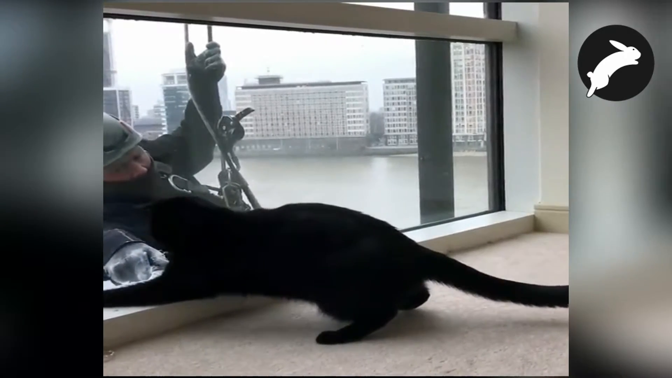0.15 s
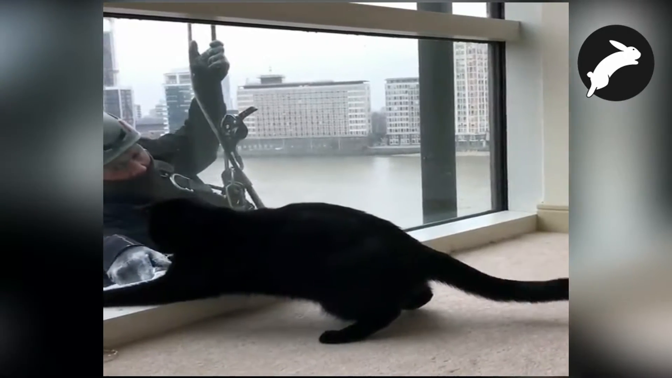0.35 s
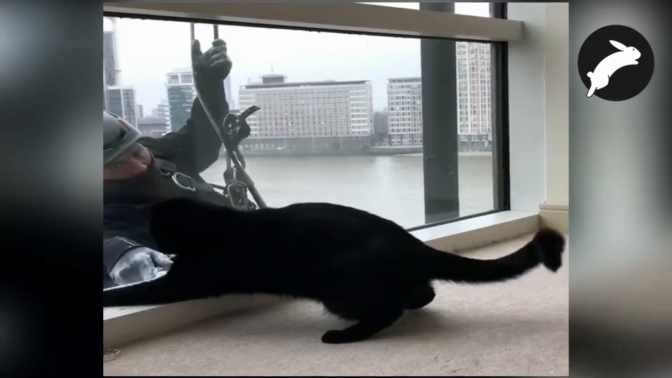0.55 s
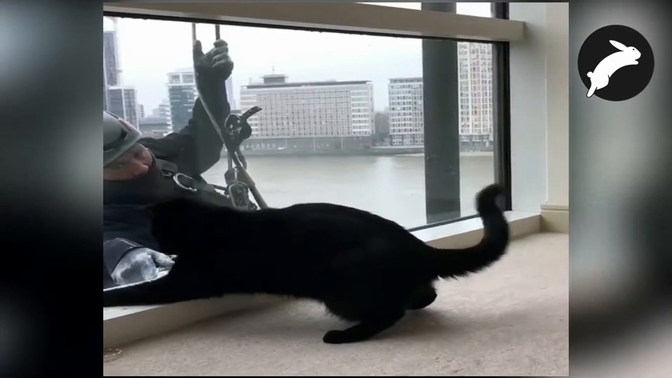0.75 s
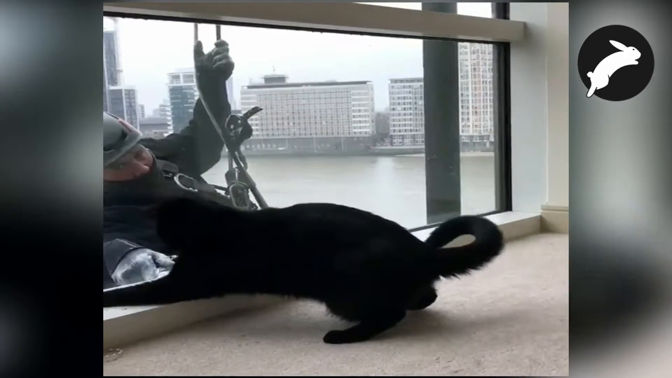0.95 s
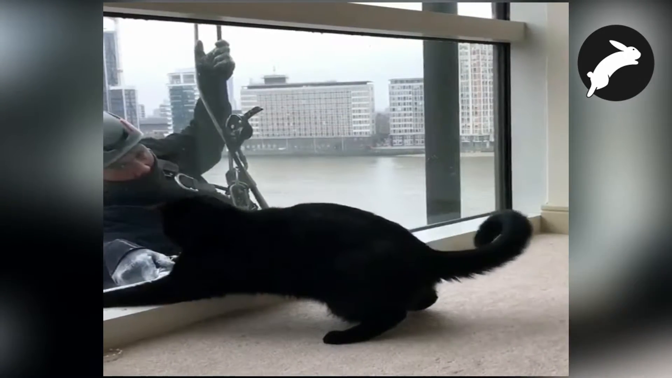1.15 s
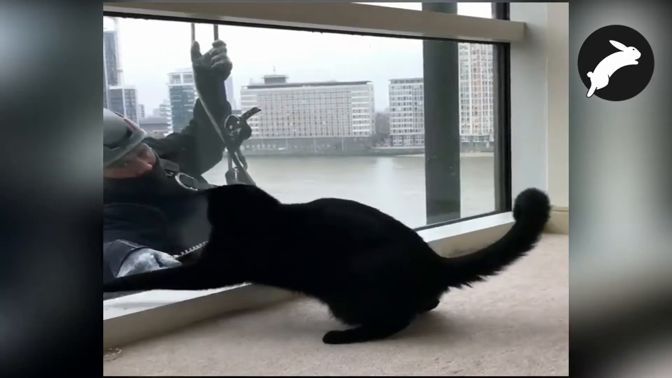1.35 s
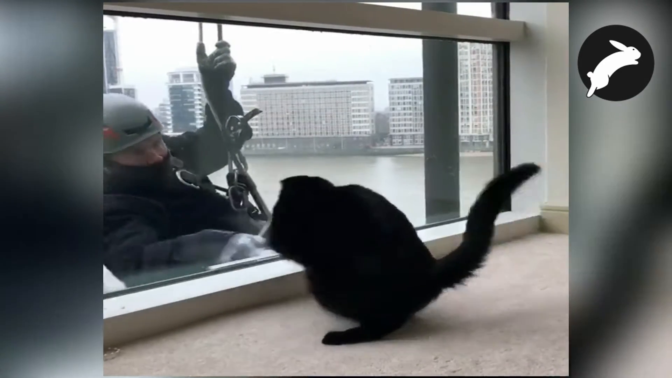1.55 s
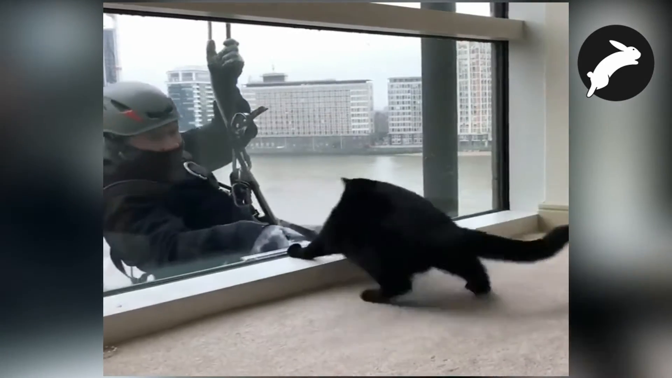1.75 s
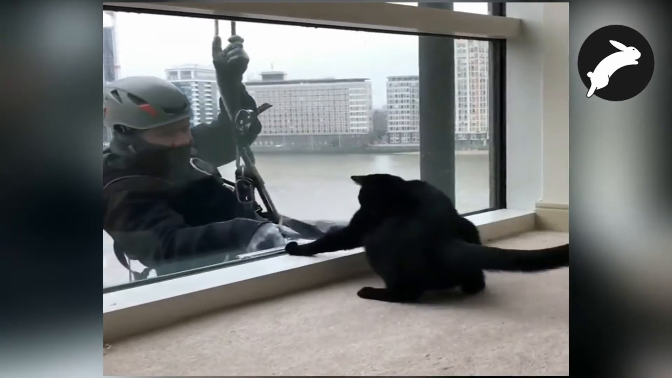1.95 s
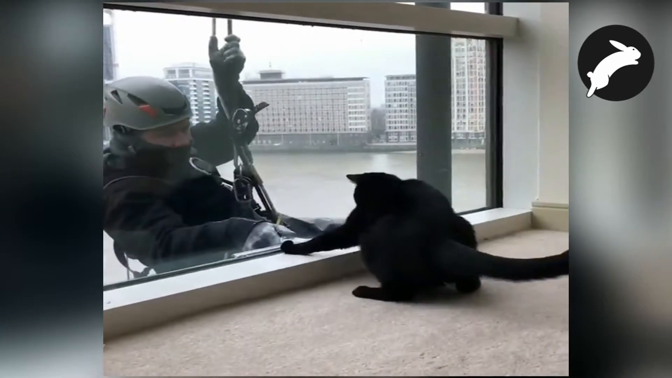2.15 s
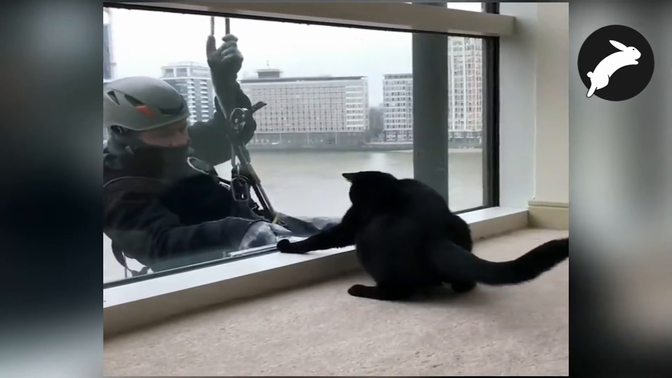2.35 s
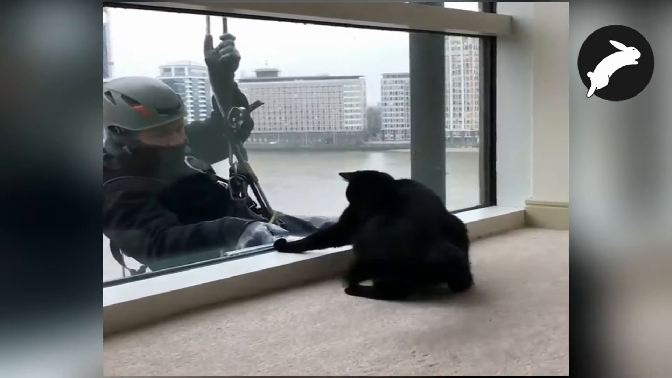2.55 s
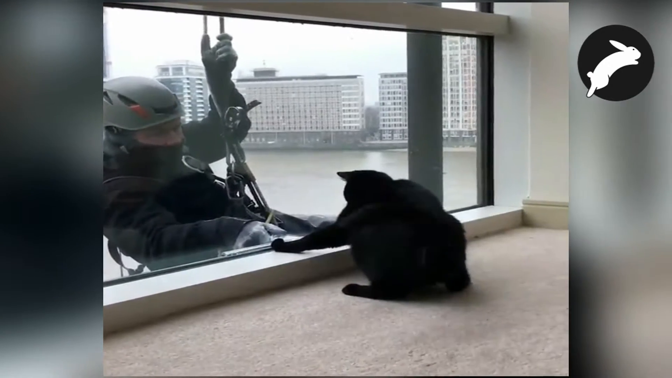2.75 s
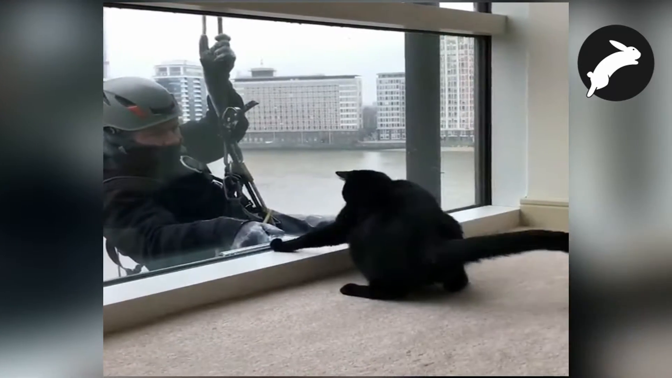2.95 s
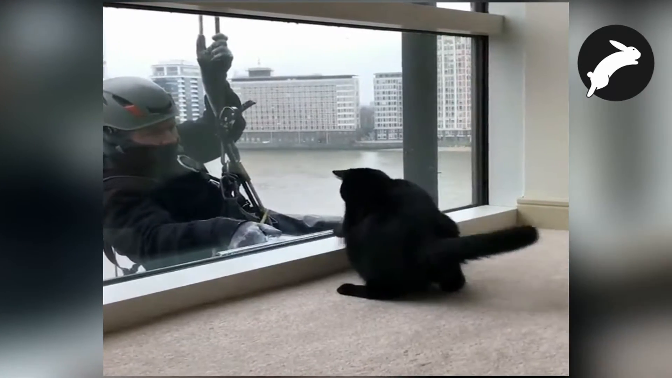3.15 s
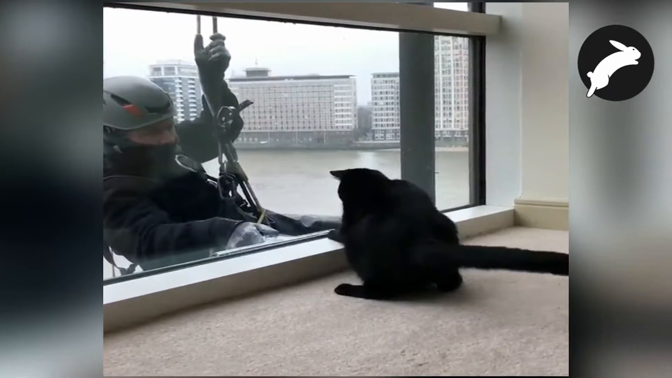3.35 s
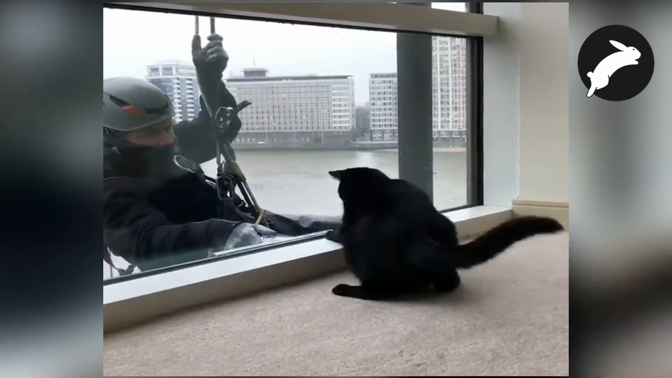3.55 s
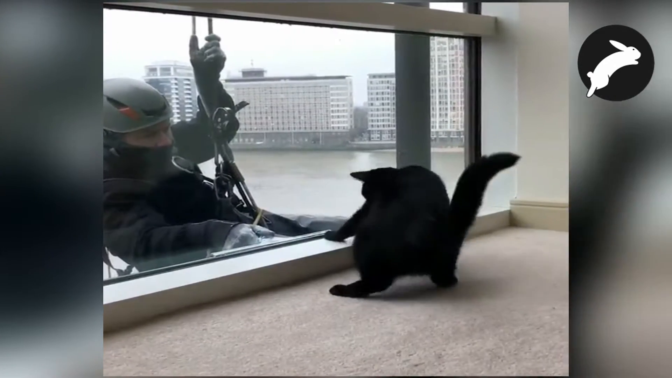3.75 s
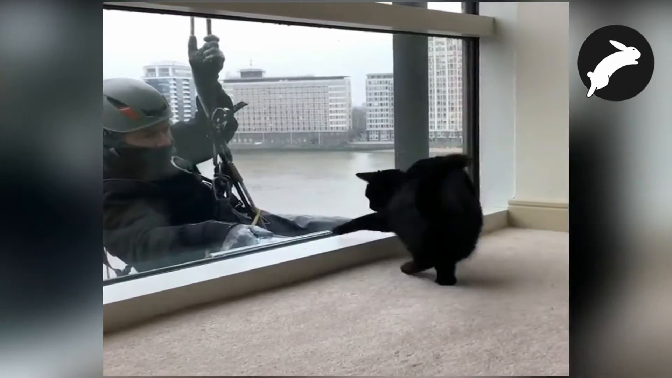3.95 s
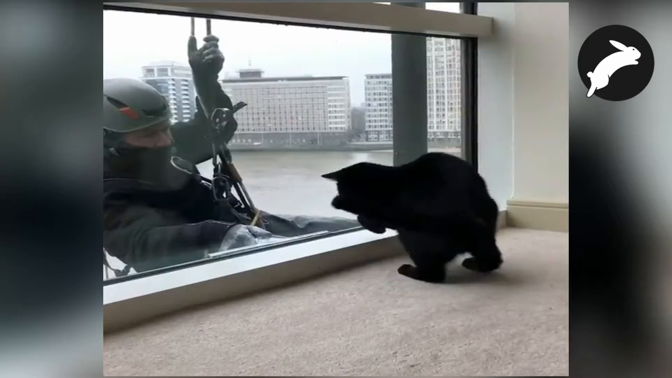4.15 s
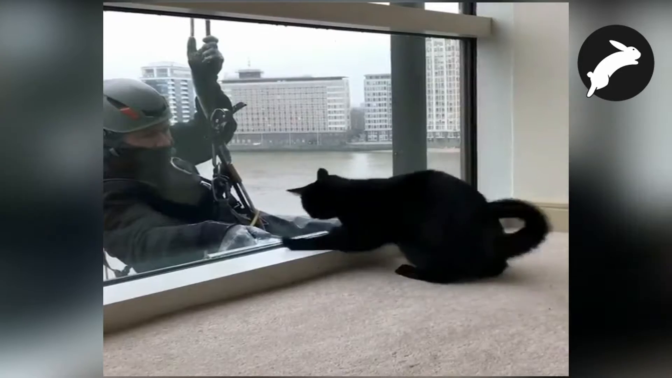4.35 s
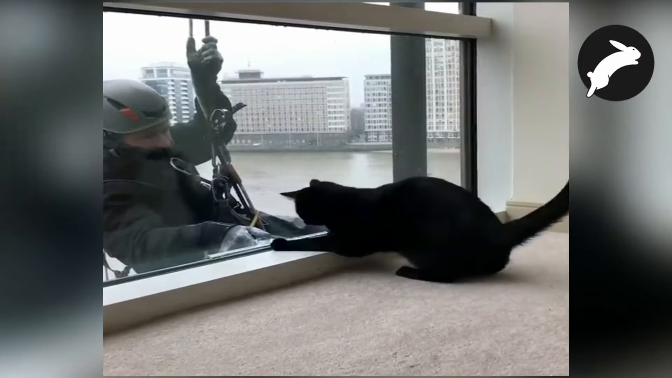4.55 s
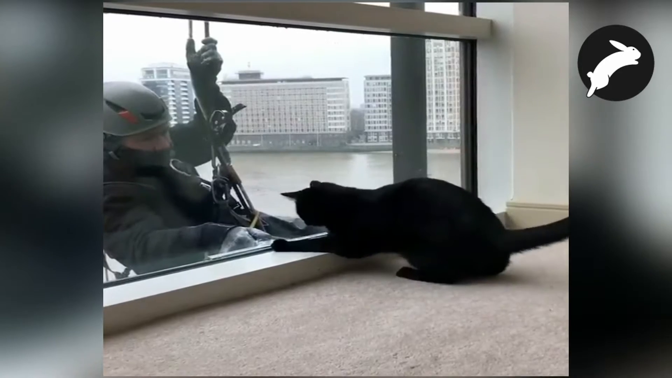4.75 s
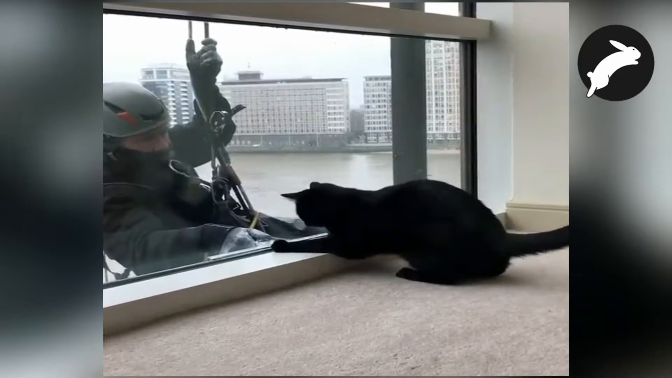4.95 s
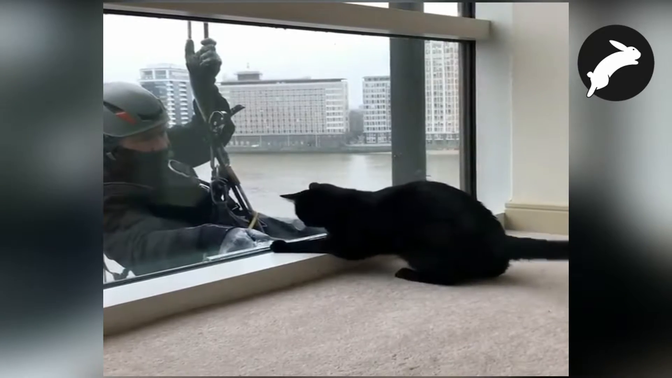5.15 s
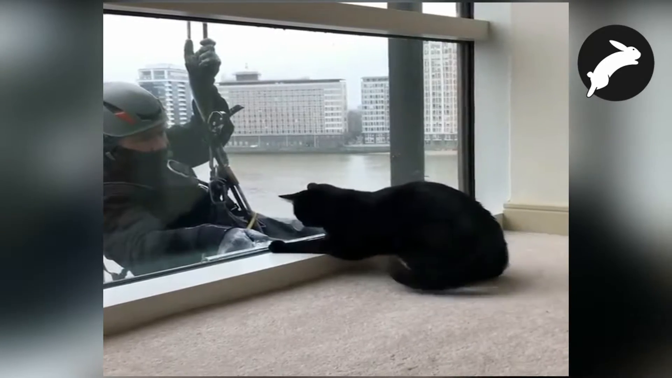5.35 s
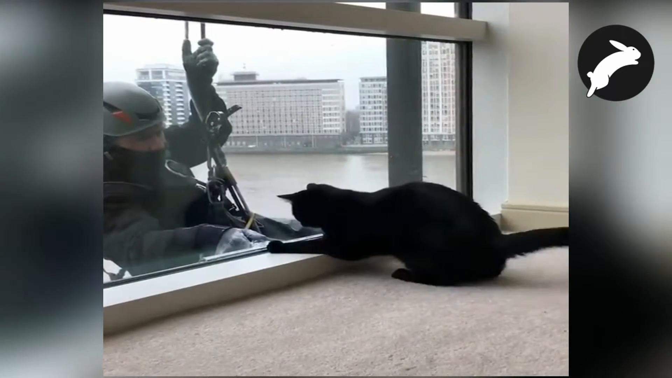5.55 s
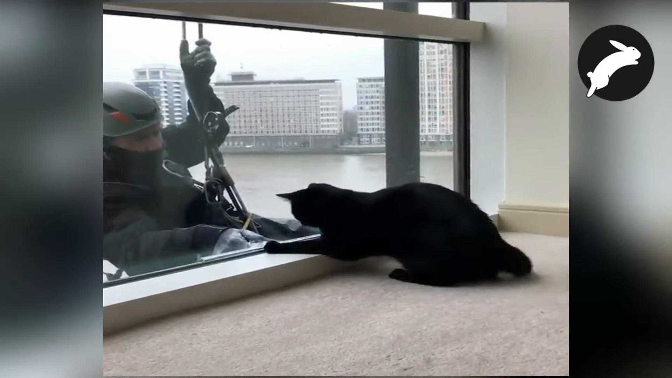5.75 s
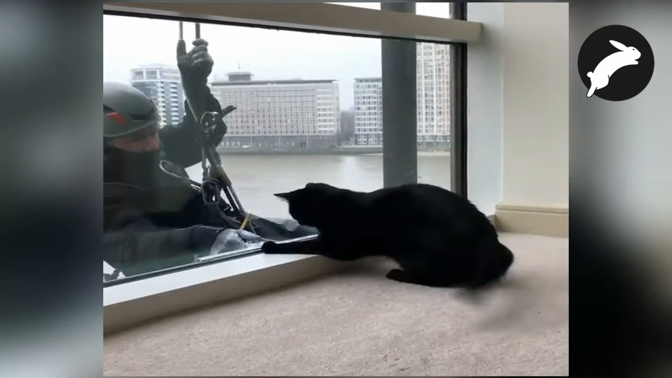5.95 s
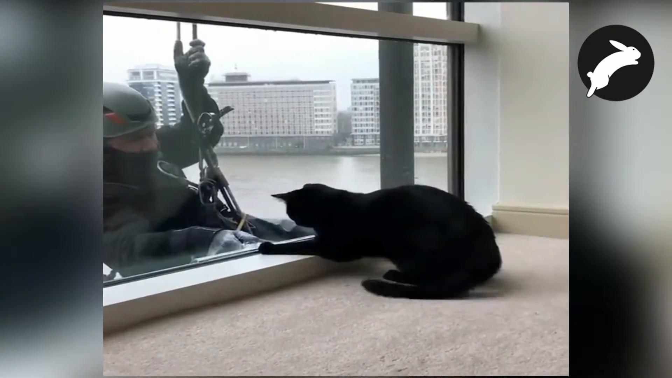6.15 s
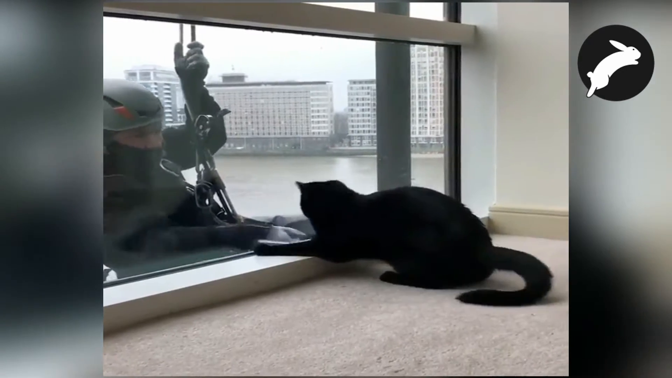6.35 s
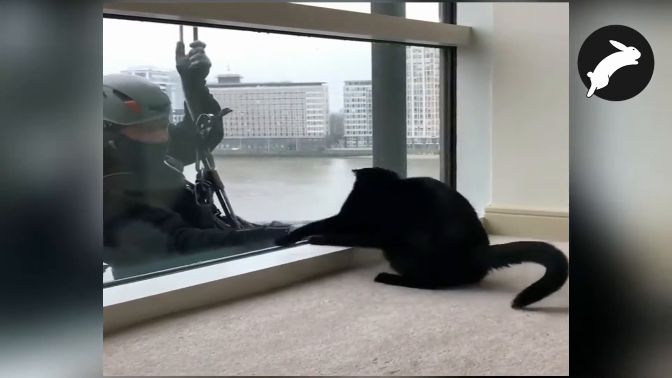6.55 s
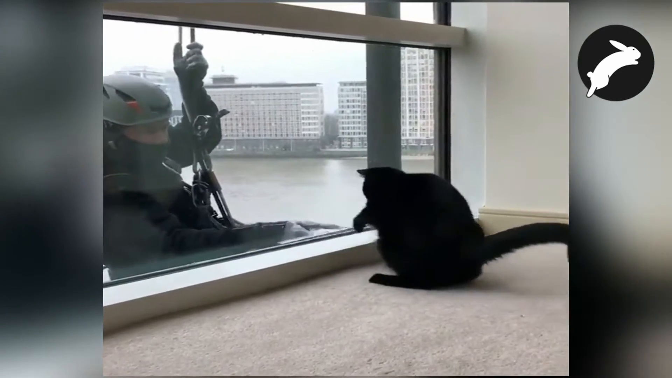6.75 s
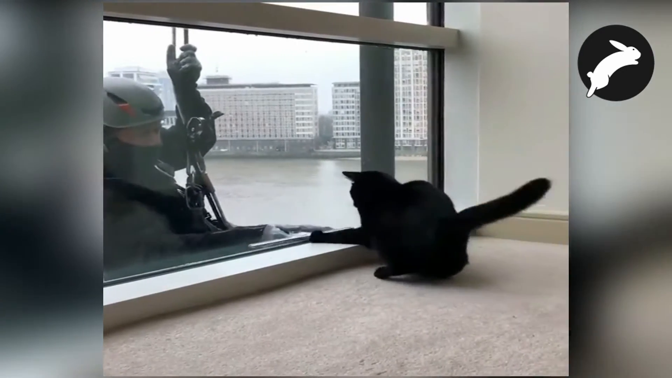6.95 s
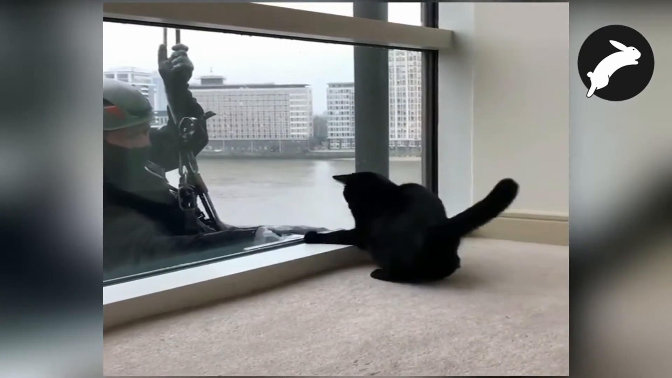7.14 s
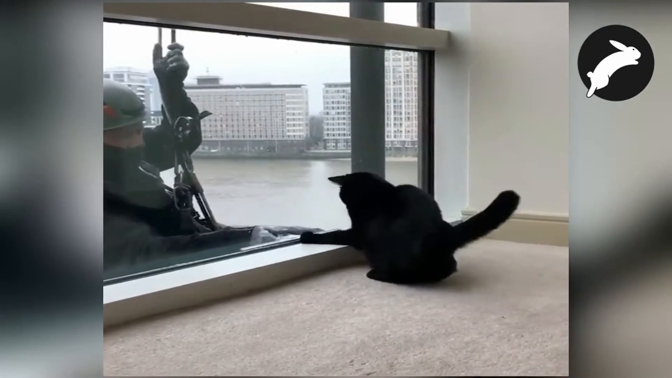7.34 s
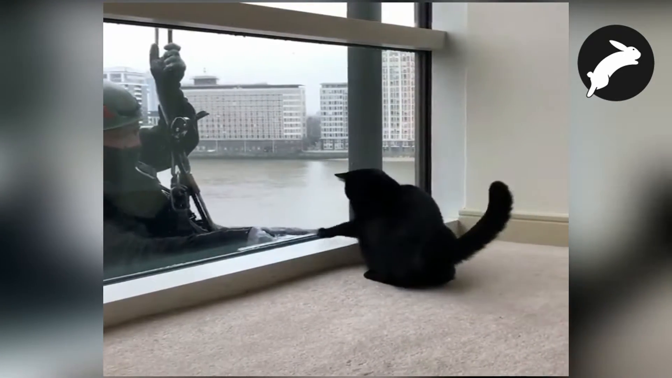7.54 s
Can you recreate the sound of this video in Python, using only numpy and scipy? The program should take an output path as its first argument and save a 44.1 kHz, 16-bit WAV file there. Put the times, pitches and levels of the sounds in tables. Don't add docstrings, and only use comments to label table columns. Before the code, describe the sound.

Inside a quiet carpeted flat, soft pads knock and brush on window glass in separate flurries while muffled traffic and a wavering engine hum outside.

```python
import sys
import numpy as np
from scipy import signal
from scipy.fft import rfft, irfft, next_fast_len
from scipy.io import wavfile
from scipy.ndimage import uniform_filter1d, map_coordinates

SR = 44100
rng = np.random.default_rng(int(sys.argv[2]) if len(sys.argv) > 2 else 0)


def amplitude_ratio(level_db):
    exponent = np.asarray(level_db, float) / 20
    return 10 ** exponent


def unload_wav(signal):
    wavfile.write(
        sys.argv[1],
        SR,
        np.round(np.clip(np.atleast_2d(signal).T, -1, 1) * 32767).astype(np.int16),
    )


N = 334968
T = np.arange(N) / SR

# [t/s, strength/dB]
CITY_STRENGTH = [(0.0, 1), (0.7, 0.5), (1.3, 1.5), (1.9, 0.5), (2.8, 0), (3.6, 0.5), (4.2, 0.5), (5.0, 0),
                 (5.9, -1), (6.6, 1.5), (7.2, 3), (7.6, 0)]
# [f/Hz, level/dB per Hz]
RUMBLE_COLOUR = [(16, -40), (28, -0.5), (75, 4), (99, -1), (140, -7), (180, -37), (310, -120)]
HUM_COLOUR = [(74, -48), (125, -10), (171, -0.5), (252, -7), (286, -7), (421, -12.5), (600, -20),
              (780, -77), (1320, -120)]
TYRE_COLOUR = [(290, -38), (500, -2.5), (531, -10), (612, -2.5), (790, -4.5), (1020, 0.5), (1900, -9.5),
               (2500, -13.5), (3250, -21.5), (5500, -120)]
# [f/Hz, width/Hz, level/dB]
ROOM_MODES = [(54.1, 4.2, 4.5), (95, 10, -2), (171.2, 6.3, 4.5), (232, 14.4, 2.5), (287, 8.3, 4)]
# [t/s, firing f/Hz, level/dB]
FIRST_PULL = [
    (0.0, 100.7, -53),
    (0.42, 98.54, -56),
    (0.6, 104.5, -49),
    (0.93, 97.4, -43),
    (1.12, 89.5, -45),
    (1.5, 86.6, -61),
]
SECOND_PULL = [
    (1.9, 63, -67),
    (2.2, 74, -45),
    (2.4, 78.9, -43.5),
    (2.92, 90.2, -43.5),
    (3.2, 87.6, -48.5),
    (3.87, 88.14, -44),
    (4.03, 86.8, -38.5),
    (4.33, 81, -57.5),
]
THIRD_PULL = [
    (4.55, 62.1, -50),
    (5.02, 59.6, -40.5),
    (5.35, 58.7, -41),
    (5.5, 53.5, -39.5),
    (5.81, 52, -41),
    (6.0, 53, -45.5),
    (6.45, 55.9, -45.5),
    (7.0, 63.9, -40),
    (7.6, 59.35, -46.5),
]
# [t/s, depth/dB, half length/s]
AIR_LULLS = [(.416, 11, 0.087), (0.988, 19, 0.057), (1.217, 10, .08), (2.11, 10, .06), (2.315, 17, .06),
             (2.563, 5, 0.057), (3.11, 10, 0.077), (3.956, 21, 0.064), (5.21, 10, 0.14), (5.445, 16, 0.073),
             (5.662, 25, .14), (5.89, 10, .06), (6.82, 10, 0.21)]
# [f/Hz, level/dB per Hz]
HISS_COLOUR = [(1060, -34), (1800, -13.5), (3070, -3), (3470, -4), (4100, -3), (4760, -6), (6180, -5.5),
               (10500, -9), (13400, -6.5), (14200, -14), (14600, -48)]
# [f/Hz, level/dB]
FOLDED_OVERTONES = [(11849, -95), (12845, -98), (13840, -82)]
# [t/s, peak level/dB, centre f/Hz]
FRAME_THUDS = [(.577, -47, 560), (1.437, -32.5, 324), (1.449, -33.5, 400), (1.658, -42, 322),
               (1.667, -31, 400), (1.6876, -30.5, 300), (1.706, -35, 188), (4.365, -35, 213),
               (4.401, -30.5, 196), (4.412, -30.5, 325), (4.427, -30.5, 199), (4.444, -40, 213),
               (4.625, -41, 400), (4.644, -46.5, 386), (6.4267, -37.5, 385), (6.439, -35, 400),
               (6.460, -49, 398), (6.495, -42, 400), (6.925, -38.5, 320), (6.936, -34, 203),
               (6.939, -34.5, 350), (7.048, -35.5, 320), (7.058, -36, 250)]
# [f/Hz, width/Hz, level/dB]
FRAME_MODES = [(195.6, 40, 2.5), (250, 66, -3), (325, 28, -2), (400, 62, -7), (555, 72, -8)]
# [f/Hz, time to fall 60 dB/s]
ROOM_DECAY = [(100, 0.48), (500, 0.27), (1500, 0.48), (5000, 0.38), (12000, 0.12)]
# [t/s, peak level/dB, centre f/Hz]
PAD_KNOCKS = [(1.384, -45, 1045), (1.4367, -29.5, 910), (1.45, -30.5, 1000), (1.646, -27, 675),
              (1.659, -25.5, 1750), (1.666, -25.5, 1150), (1.678, -31, 1240), (1.6875, -21.5, 1000),
              (1.693, -27.5, 1820), (1.698, -24.5, 1080), (1.707, -28, 1060), (4.364, -43.5, 883),
              (4.396, -29, 1080), (4.401, -21, 1010), (4.411, -20, 1270), (4.427, -26, 920),
              (4.444, -33, 1300), (4.635, -48, 1390), (6.240, -46, 1020), (6.4257, -24.5, 854),
              (6.4271, -44, 1800), (6.439, -33.5, 1110), (6.460, -45, 850), (6.883, -41, 1510),
              (6.926, -35, 1150), (6.936, -27.5, 704), (6.939, -27, 1370), (6.950, -34, 1650),
              (7.048, -38, 1050), (7.055, -32, 940)]
# [f/Hz, width/Hz, level/dB]
GLASS_MODES = [(627, 74, -3), (845, 84, -1), (1050, 95, 0), (1192, 60, 2), (1314, 57, 0.5),
               (1422, 63, -0.5), (1595, 65, -3), (1800, 77, -4.5), (2000, 220, -10), (2490, 54, -4.5)]
# [t/s, peak level/dB, centre f/Hz, width/Hz, time to fall 60 dB/s]
CLAW_TICKS = [(1.437, -47.5, 3500, 4000, .06), (1.6461, -20.5, 4050, 2430, 0.018),
              (1.6486, -23, 2880, 1500, 0.018), (1.653, -23, 2160, 1490, 0.02),
              (2.914, -50, 5400, 700, .03), (3.25, -49, 5200, 2500, 0.018),
              (4.3413, -27, 3800, 3000, 0.0053), (4.345, -35.5, 2000, 2000, .031),
              (4.4302, -24.5, 5000, 12000, .0034), (6.4262, -40, 2410, 800, 0.018),
              (6.881, -37.5, 3970, 4000, 0.027), (6.8846, -37, 2190, 3000, .04),
              (7.05, -45, 3480, 4000, .02), (7.539, -44.5, 5450, 600, .022), (7.540, -49, 2840, 900, .022),
              (7.550, -50.5, 5630, 500, .06)]
# [peak t/s, level/dB, rise/dB per s, fall/dB per s]
FUR_STROKES = [
    (1.445, -56, 600, 120),
    (1.538, -61, 300, 900),
    (1.655, -42.5, 3002, 146),
    (4.411, -57, 900, 70),
    (4.465, -38, 210, 323),
    (4.644, -61, 300, 397),
    (6.943, -45, 900, 305),
]
# [f/Hz, level/dB per Hz]
FUR_COLOUR = [(1290, -15), (2200, -4), (4020, -1), (4960, -4.5), (5700, -5.5), (7960, -6.5), (8660, -6),
              (14000, -8.5)]
# [t/s, peak level/dB, f/Hz, time to fall 60 dB/s]
PANE_BOOMS = [
    (1.686, -25.5, 91, 0.14),
    (4.385, -28, 95, 0.089),
    (4.477, -24.5, 82.7, 0.21),
    (6.434, -34, 95, 0.21),
    (6.434, -35, 131, 0.15),
    (6.897, -37, 70.4, 0.11),
]

CONTACT_S = 0.0042


def unit(x):
    return x / np.sqrt(np.mean(x ** 2) + 1e-20)


def along(points, hz):
    f, value = np.transpose(points)
    return np.interp(np.log(hz + 1), np.log(f + 1), value)


def wobble(rate):
    knots = rng.standard_normal(int(N * rate / SR) + 4)
    return map_coordinates(knots, [T * rate])


def filtered(x, response):
    size = next_fast_len(x.shape[-1] + 8192)
    spectrum = rfft(x, size) * response(np.fft.rfftfreq(size, 1 / SR))
    return irfft(spectrum, size)[..., :x.shape[-1]]


def rush(colour, patchy_db):
    z = signal.stft(rng.standard_normal(N + 512), nperseg=512)[2]
    patches = uniform_filter1d(rng.standard_normal(z.shape), size=5, axis=0)
    patches = uniform_filter1d(patches, size=12, axis=1)
    noise = signal.istft(z * amplitude_ratio(patchy_db * unit(patches)), nperseg=512)[1][:N]
    return unit(filtered(noise, lambda f: amplitude_ratio(along(colour, f))))


def resonance(f, hz, width):
    return 1j * f * width / (hz * hz - f * f + 1j * f * width)


def body(modes, spread_db):
    gains = amplitude_ratio(spread_db * rng.standard_normal(len(modes)))
    gains = gains * (-1) ** np.arange(len(modes))

    def response(f):
        return sum(g * amplitude_ratio(db) * resonance(f, hz, width) for g, (hz, width, db) in zip(gains, modes))
    return response


def blow(length):
    t = T[:SR // 5]
    push = 0.079 * rng.standard_normal(len(t)) * np.exp(-t / max(length, 0.0005))
    push[0] = min(1, CONTACT_S / length)
    return push


def add(track, s, sound, peak_db):
    at = round(s * SR)
    scaled = amplitude_ratio(peak_db) * sound / np.abs(sound).max()
    track[at:at + len(sound)] += scaled[:len(track) - at]


def city():
    strength_db = np.interp(T, *np.transpose(CITY_STRENGTH))
    swell = wobble(4.036)
    rumble_db = -48.5 + strength_db + swell + 0.95 * wobble(4.55)
    hum_db = -56.5 + 0.076 * strength_db + 0.81 * swell
    tyre_db = -60 + 0.098 * strength_db + 0.36 * swell
    rumble = amplitude_ratio(rumble_db) * rush(RUMBLE_COLOUR, patchy_db=1)
    hum = amplitude_ratio(hum_db) * rush(HUM_COLOUR, patchy_db=2.0)
    tyres = amplitude_ratio(tyre_db) * rush(TYRE_COLOUR, patchy_db=1.5)

    def room_lift(f):
        return 1 + sum(amplitude_ratio(db - 4.5) * resonance(f, hz, width) for hz, width, db in ROOM_MODES)
    return filtered(rumble + hum, room_lift) + tyres


def engine():
    out = np.zeros(N)
    lull_db = sum(depth * np.clip(1 - np.abs(T - s) / half, 0, 1) for s, depth, half in AIR_LULLS)
    pulls = [(FIRST_PULL, -9, -28, -26), (SECOND_PULL, -7, -26, -26), (THIRD_PULL, -30, -8, -24)]
    for pull, half_db, three_halves_db, twice_db in pulls:
        s, hz, db = np.transpose(pull)
        firing_hz = np.interp(T, s, hz) * (1 + 0.0251 * wobble(9))
        turn = 2 * np.pi * np.cumsum(firing_hz) / SR
        tone = np.sin(turn) + amplitude_ratio(half_db) * np.sin(turn / 2)
        tone += amplitude_ratio(three_halves_db) * np.sin(3 * turn / 2) + amplitude_ratio(twice_db) * np.sin(2 * turn)
        fade = np.clip(np.minimum(T - s[0] + 0.11, s[-1] + 0.11 - T) / 0.15, 0, 1)
        level_db = np.interp(T, s, db) + 1.1 * wobble(7) + 1.1 * wobble(13) - lull_db
        out += fade * amplitude_ratio(level_db) * np.sqrt(2) * tone
    return out


def microphone_hiss():
    return amplitude_ratio(-64.1) * rush(HISS_COLOUR, patchy_db=1.8)


def clock_whine():
    lines = list(FOLDED_OVERTONES)
    for k in range(1, 13):
        odd_db = -1.5 if k % 2 and k > 4 else 0
        lines.append((k * 993.6, -77.5 - 0.5341 * k + odd_db))
    out = np.zeros(N)
    for hz, db in lines:
        tone = np.sqrt(2) * np.sin(2 * np.pi * (hz * T + rng.random()))
        out += amplitude_ratio(db + 1.5 * wobble(3.02)) * tone
    return out


def frame_thuds():
    out = np.zeros(N)
    for s, db, hz in FRAME_THUDS:
        frame = body(FRAME_MODES, spread_db=3.5)
        thud = filtered(blow(0.0066), lambda f: frame(f) * resonance(f, hz, 0.8 * hz) ** 2)
        add(out, s, thud, db)
    return out


def room(x):
    out = np.zeros(N + SR)
    for at in range(0, N, SR // 8):
        hz, t, z = signal.stft(rng.standard_normal(SR // 2), SR, nperseg=256)
        decay = amplitude_ratio(-60 * t / along(ROOM_DECAY, hz)[:, None])
        tail = signal.istft(z * decay, SR, nperseg=256)[1]
        tail = np.pad(tail, (330, 0)) / np.linalg.norm(tail)
        wet = signal.fftconvolve(x[at:at + SR // 8], tail)
        out[at:at + len(wet)] += wet
    return out[:N]


def glass_knocks():
    out = np.zeros(N)
    for s, db, hz in PAD_KNOCKS:
        glass = body(GLASS_MODES, spread_db=2.5)
        softness_db = -24.5 - db
        push = blow(CONTACT_S * amplitude_ratio(0.58 * softness_db))

        def response(f):
            dulling = 1 + 1j * f / (1.7 * hz)
            return glass(f) * resonance(f, hz, 0.56 * hz) ** 2 / dulling
        add(out, s, filtered(push, response), db)
    return out


def claw_ticks():
    out, t = np.zeros(N), T[:SR // 8]
    for s, db, hz, width, t60 in CLAW_TICKS:
        onset = 1 - np.exp(-t / (0.0051 * t60))
        crack = rng.standard_normal(len(t)) * amplitude_ratio(-60 * t / t60) * onset

        def response(f):
            return resonance(f, hz, width) ** 2 + amplitude_ratio(-19) * resonance(f, 15000, 9000)
        add(out, s, filtered(crack, response), db)
    return out


def fur_brush():
    level = sum(amplitude_ratio(db + np.minimum(rise * (T - s), fall * (s - T))) for s, db, rise, fall in FUR_STROKES)
    grain_db = 1.8 * wobble(450) + 0.9 * wobble(90)
    return level * unit(amplitude_ratio(grain_db) * rush(FUR_COLOUR, patchy_db=0.3))


def pane_booms():
    out, t = np.zeros(N), T[:SR // 2]
    for s, db, hz, t60 in PANE_BOOMS:
        swell = 1 - np.exp(-t / 0.0039)
        add(out, s, np.sin(2 * np.pi * hz * t) * amplitude_ratio(-60 * t / t60) * swell, db)
    return out


def scene():
    outside = city() + engine()
    pads = frame_thuds() + glass_knocks() + fur_brush()
    claws = claw_ticks()
    echo = room(amplitude_ratio(-9) * claws + amplitude_ratio(-7.5) * pads)
    return (outside + pads + claws + echo + pane_booms())[None]


def top_cut(x):
    return signal.sosfilt(signal.butter(12, 14730, fs=SR, output="sos"), x)


def record(dry):
    wired = dry + microphone_hiss() + clock_whine()

    def limits(f):
        bass_cut = f ** 4 / (f ** 4 + 40.0 ** 4)
        return bass_cut / (1 + (f / 13980) ** 150)
    return top_cut(filtered(wired, limits))


dry = scene()
out = record(dry)
unload_wav(out)
```